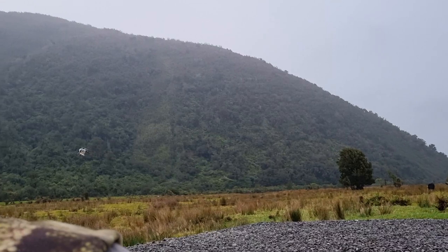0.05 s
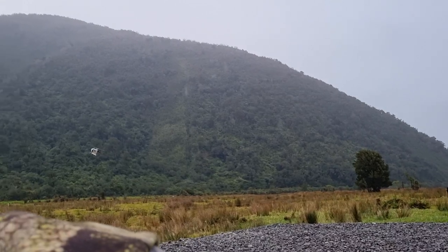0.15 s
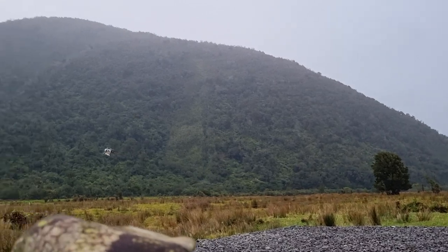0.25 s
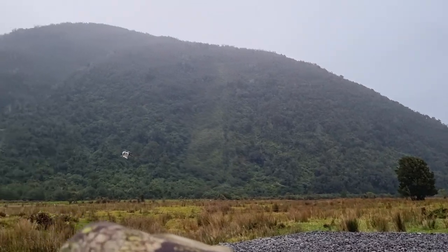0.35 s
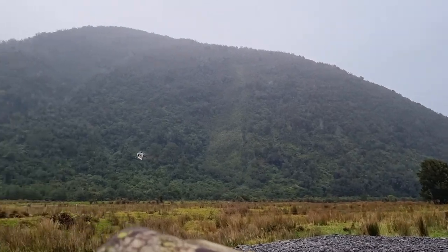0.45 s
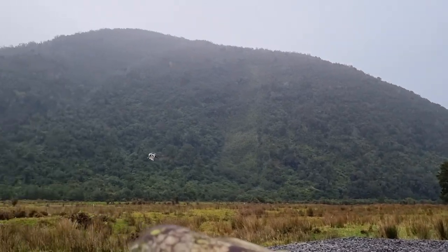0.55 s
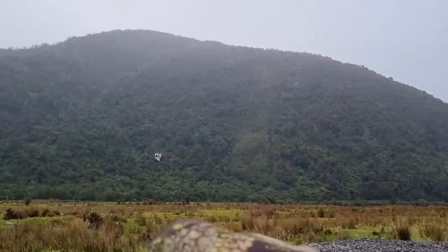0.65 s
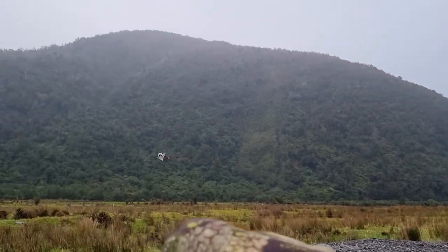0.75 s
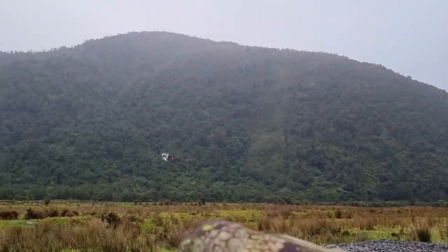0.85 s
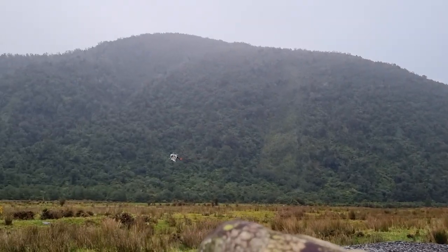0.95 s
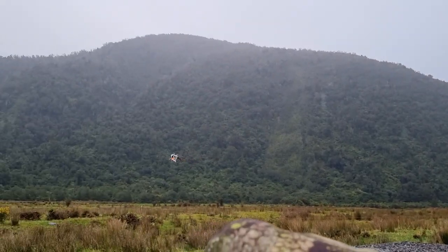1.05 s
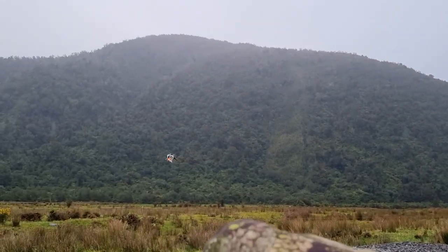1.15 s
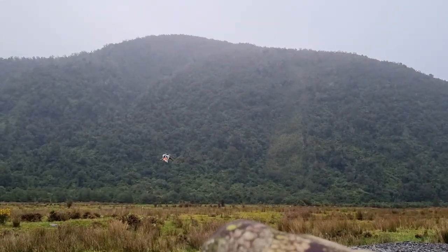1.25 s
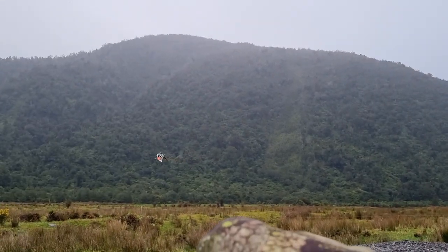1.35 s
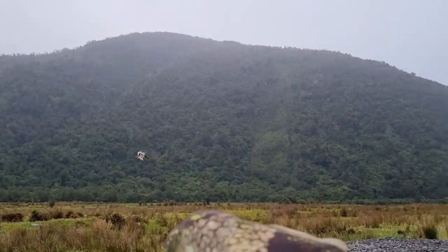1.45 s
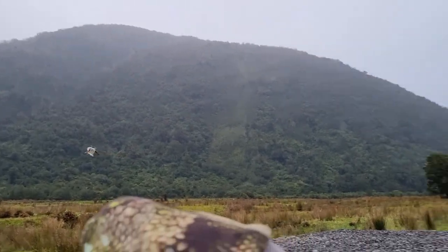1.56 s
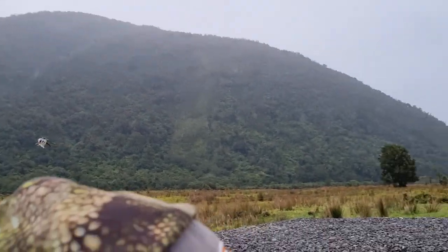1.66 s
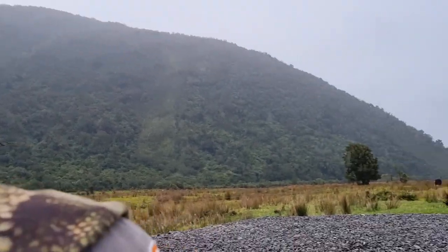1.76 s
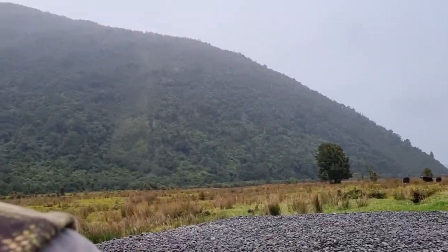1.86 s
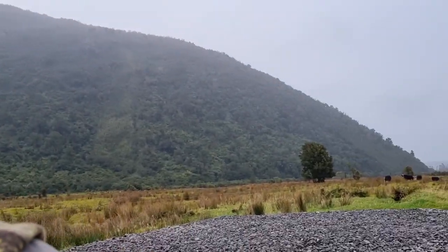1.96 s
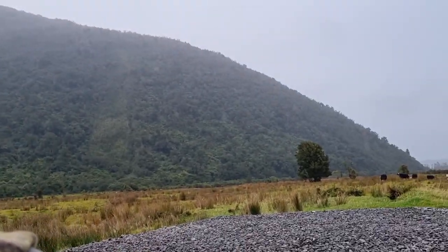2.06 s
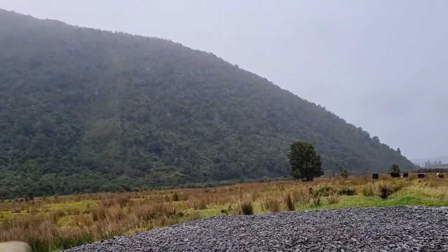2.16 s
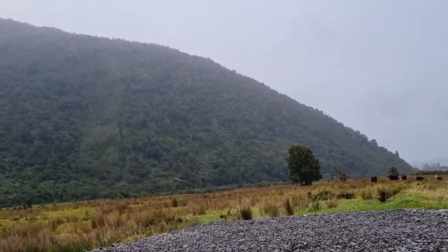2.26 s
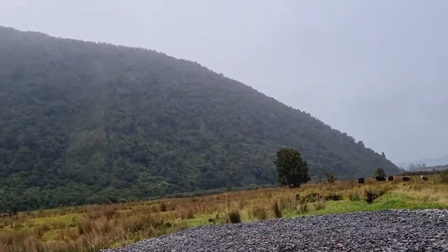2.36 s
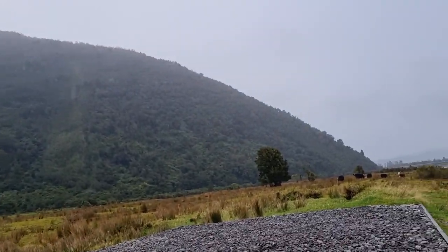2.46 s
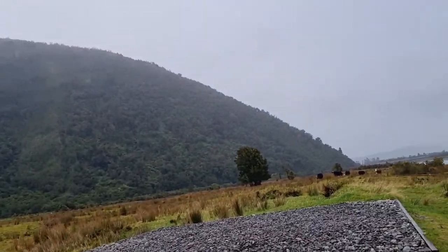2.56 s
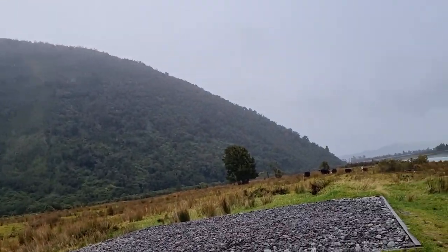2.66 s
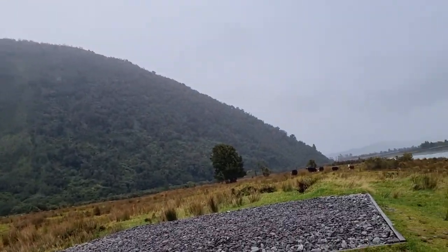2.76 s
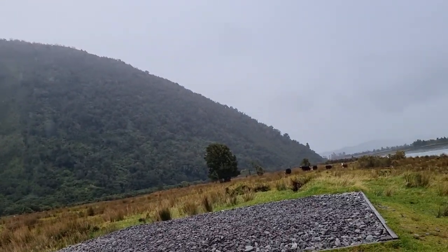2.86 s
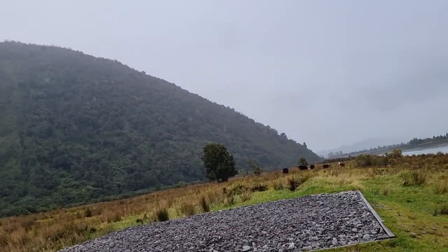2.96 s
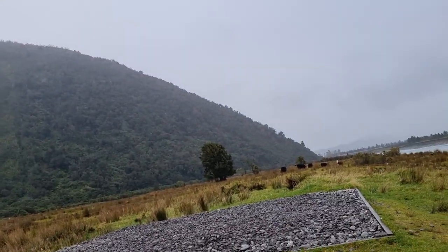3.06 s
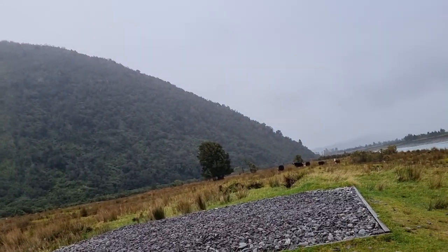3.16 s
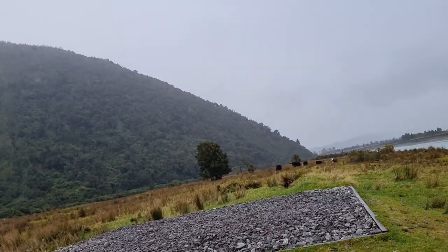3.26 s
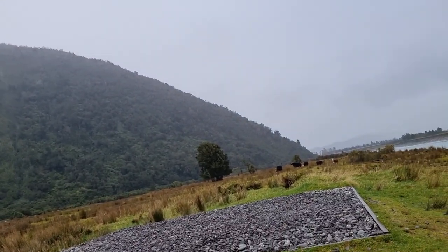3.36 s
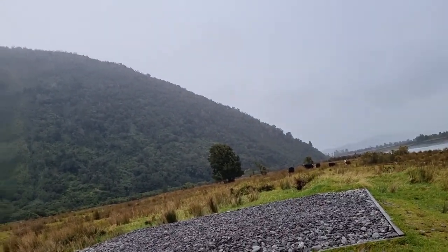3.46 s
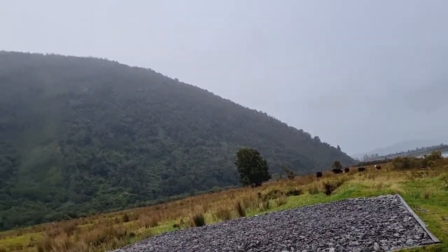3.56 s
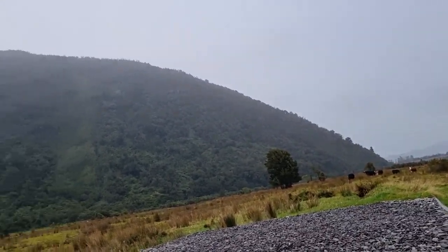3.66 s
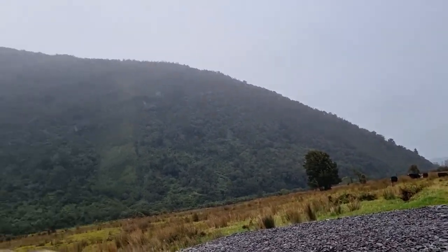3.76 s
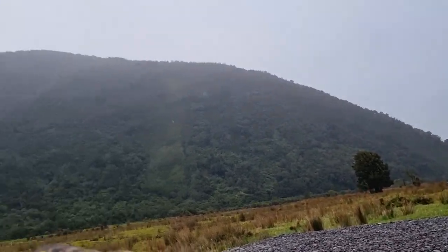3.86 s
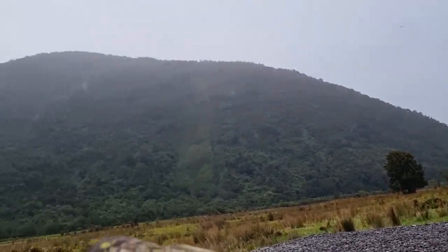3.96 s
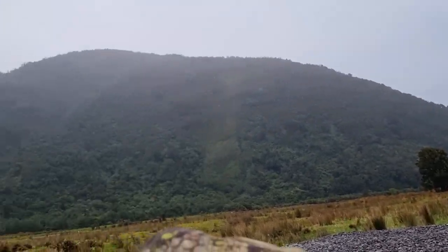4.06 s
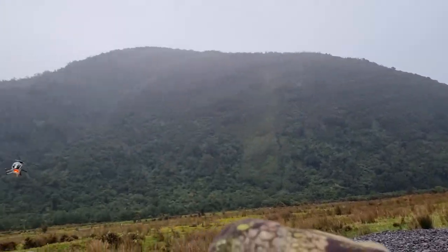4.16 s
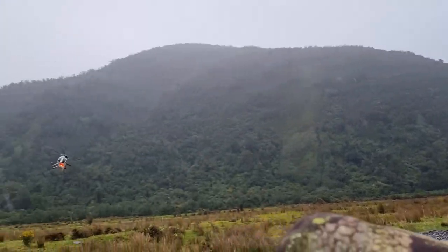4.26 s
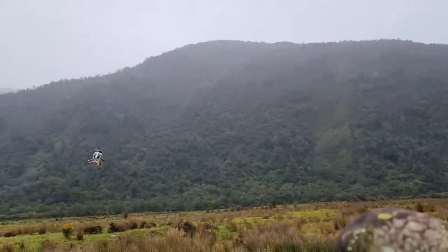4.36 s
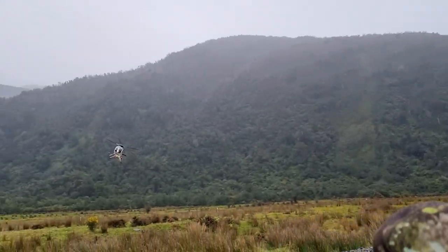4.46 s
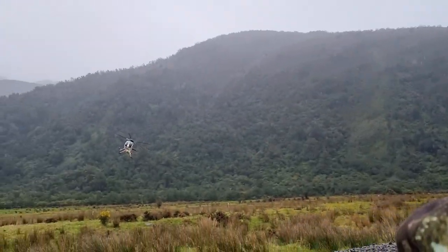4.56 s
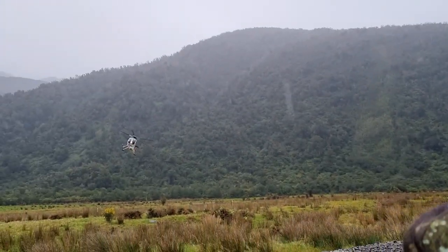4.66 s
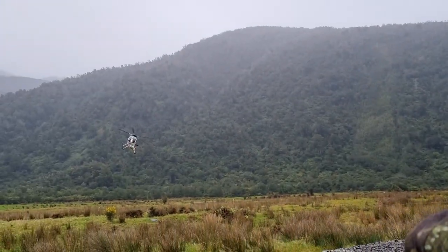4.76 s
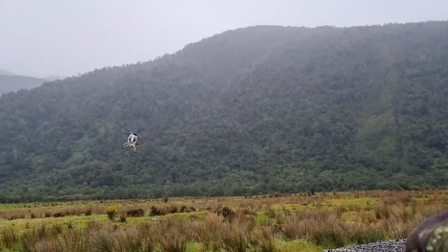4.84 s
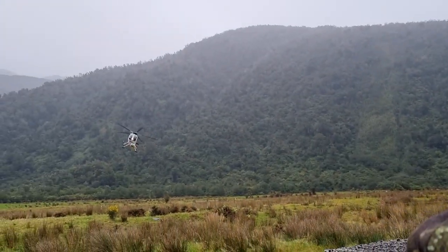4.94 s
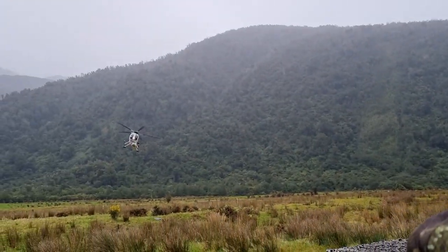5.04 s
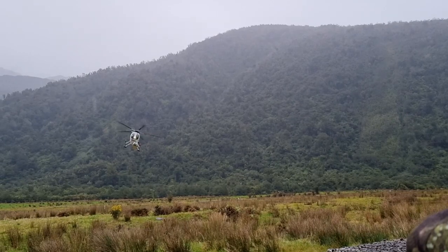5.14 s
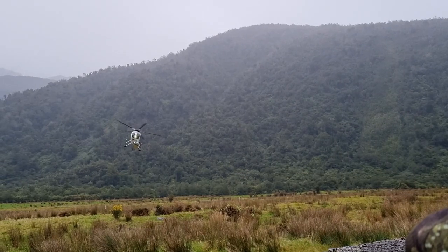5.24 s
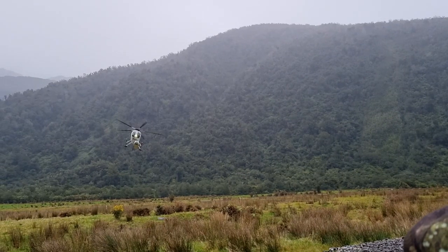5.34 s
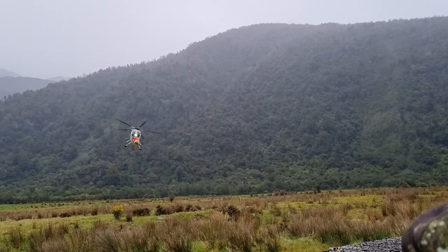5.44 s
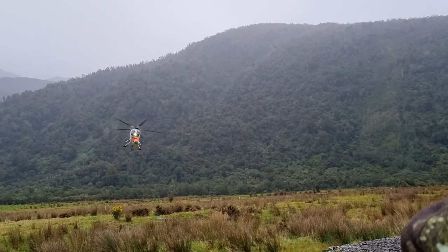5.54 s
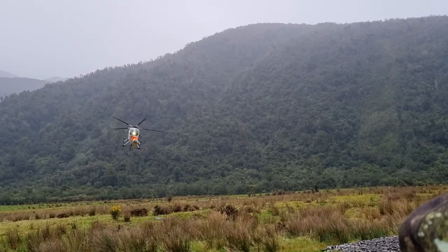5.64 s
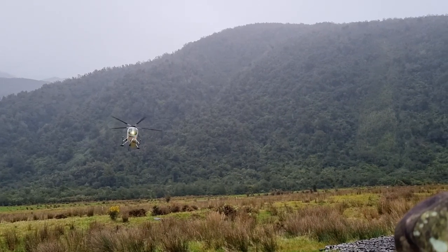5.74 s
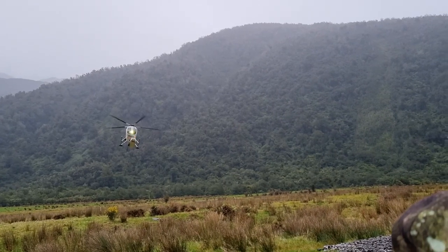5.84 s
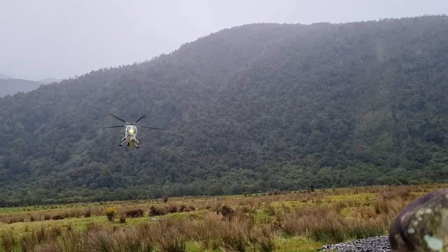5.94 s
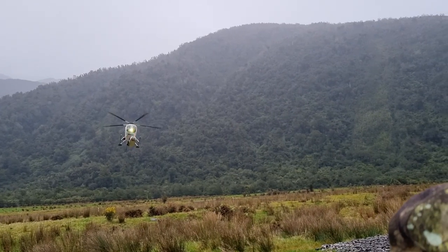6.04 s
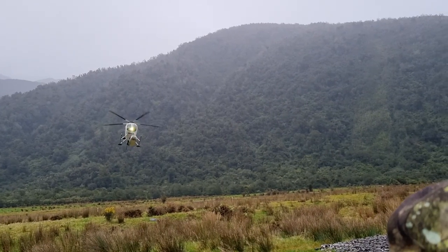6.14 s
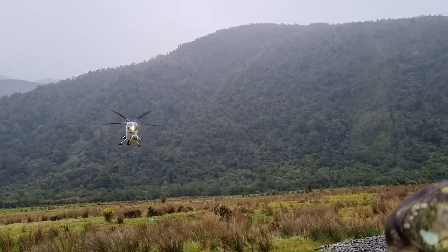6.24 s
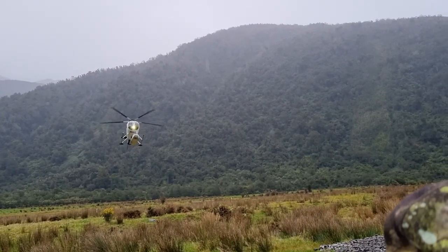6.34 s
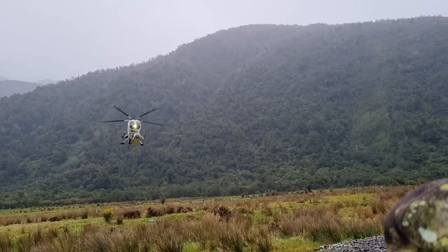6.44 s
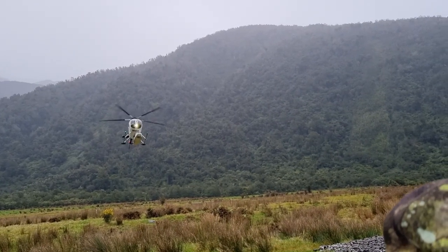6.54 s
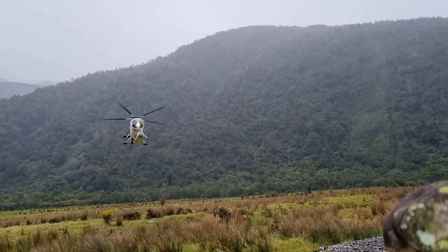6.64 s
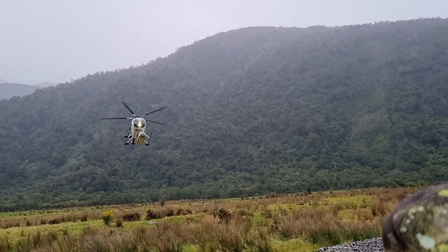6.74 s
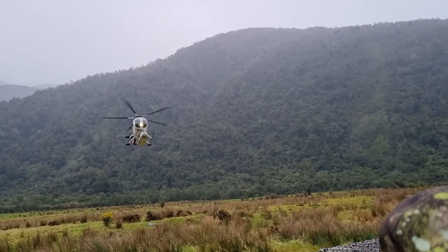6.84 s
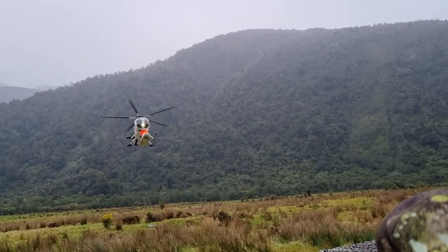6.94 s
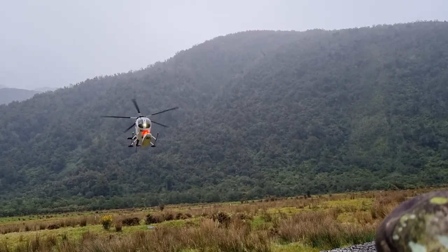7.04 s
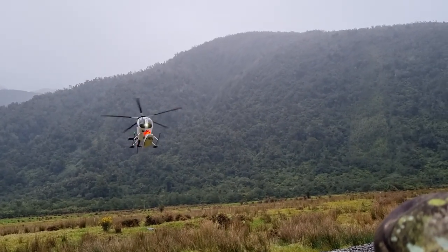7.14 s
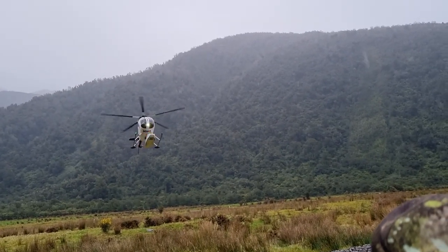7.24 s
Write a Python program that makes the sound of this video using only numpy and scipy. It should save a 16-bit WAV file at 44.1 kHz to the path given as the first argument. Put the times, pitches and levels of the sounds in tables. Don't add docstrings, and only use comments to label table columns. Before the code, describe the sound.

A distant helicopter's steady roar and fluttering hum come closer over a grassy valley. The colour and stereo image shift as the person holding the microphones turns aside, cloth barely rustling, then turns back. Quick airy swishes at each blade pass sharpen near four seconds, then give way to rapid, heavy, uneven blade slaps, full and close, easing only slightly at the end.

```python
import sys
import numpy as np
from scipy import signal
from scipy.fft import rfft, irfft
from scipy.io import wavfile
from scipy.ndimage import map_coordinates

SR = 44100
rng = np.random.default_rng(int(sys.argv[2]) if len(sys.argv) > 2 else 0)


def digitize_waveform(pressure):
    field = np.atleast_2d(pressure).T
    bounded = np.clip(field, -1, 1)
    quanta = np.round(bounded * 32767).astype(np.int16)
    wavfile.write(sys.argv[1], SR, quanta)


def to_linear_factor(level_db):
    exponent = np.asarray(level_db, float) / 20
    return 10 ** exponent


N = 321930
T = np.arange(N) / SR
HZ = np.fft.rfftfreq(N, 1 / SR) + 1e-3

CLOSING_DB_PER_S = 1.37
FLARE_S, FLARE_WIDTH_S = 4.71, 0.63


def rms_one(x):
    return x / np.sqrt(np.mean(x ** 2) + 1e-20)


def in_time(rows):
    s, *columns = np.transpose(rows)
    return [np.interp(T, s, c) for c in columns]


def at_hz(points, hz=HZ):
    table_hz, db = np.array(points).T
    return np.interp(np.log(hz), np.log(table_hz), db)


def colour(x, points):
    return irfft(rfft(x) * to_linear_factor(at_hz(points)), N)


def drift(rate_hz):
    r = np.exp(-80 * np.pi * rate_hz / SR)
    slow = signal.lfilter([1], [1, -2 * r, r * r], rng.standard_normal(N // 40 + 2002))[2000:]
    return np.interp(np.arange(N) / 40, np.arange(len(slow)), rms_one(slow))


def smooth_step(t, middle, width):
    return .5 + .5 * np.tanh((t - middle) / width)


def bump(t, middle, width):
    return np.exp(-((t - middle) / width) ** 2)


# time in seconds, rate in Hz.
BLADE_RATE = [(0.0, 44.191), (0.73, 43.658), (1.46, 43.515), (2.19, 43.185), (2.92, 43.176), (3.65, 42.871),
              (4.38, 42.369), (5.11, 41.844), (5.84, 41.948), (6.57, 42.041), (7.3, 41.725)]


def blade_cycles():
    return np.cumsum(in_time(BLADE_RATE)[0]) / SR


# time in seconds, level in dB.
THICKNESS_LEVEL = [(0, -35.5), (1.0, -32), (2.2, -31), (3.3, -29.5), (3.8, -26.5), (4.3, -33), (4.8, -36),
                   (5.3, -23.5), (5.85, -16.5), (6.4, -21.5), (7.3, -18)]
LIFT_DB, THIRD_DB, THIRD_FLARE_DB = -26.5, -38.5, 13.5
ORDER_LOSS_DB, ORDER_CURVE = 6.5, 0.71


def rotor_hum(cycles):
    near = CLOSING_DB_PER_S * (T - T[-1])
    flare = smooth_step(T, FLARE_S, FLARE_WIDTH_S)
    turn = 2 * np.pi * (cycles - .325)
    uneven = to_linear_factor(0.36 * np.cos(2 * np.pi * cycles / 5) + 0.26 * drift(30))
    first_db = LIFT_DB + near + 1.3 * drift(1.8)
    second_db = in_time(THICKNESS_LEVEL)[0] + 0.71 * drift(3.0)
    third_db = THIRD_DB + 0.38 * near + THIRD_FLARE_DB * flare
    third_db = third_db + 2.8 * bump(T, 5.98, 0.67) + 1.66 * drift(4.5)
    high = sum(to_linear_factor(-ORDER_LOSS_DB * k ** ORDER_CURVE) * np.cos((3 + k) * turn) for k in range(7))
    upper = to_linear_factor(second_db) * np.cos(2 * turn) + to_linear_factor(third_db) * high
    return np.sqrt(2) * (upper * uneven - to_linear_factor(first_db) * np.cos(turn))


# time in seconds, level in dB, place in the blade cycle 0-1,
# vortex spacing against the usual.
SLAP_COURSE = [
    (4.3, -51, 0.07, 0.84),
    (4.8, -27.5, 0.27, 1.04),
    (5.15, -19, 0.22, 0.99),
    (5.5, -15.5, 0.25, 1.13),
    (5.9, -15, 0.27, 1.14),
    (6.3, -16, 0.19, 1.12),
    (6.6, -15.5, .29, 1.12),
    (6.9, -17, 0.24, 1.1),
    (7.3, -18, 0.14, 1.06),
]
# frequency in Hz, level in dB per Hz.
SLAP_SPECTRUM = [(120, -39), (250, -12.5), (420, 3), (750, -3.5), (1000, 1), (1500, -9.5), (2000, -26.5),
                 (3000, -36), (4500, -31.5), (7000, -48.5)]
# delay in ms, level in dB.
VORTICES = [(-0.3, -5), (0.68, 0.5), (1.91, 1.1), (3, -11)]
BLADE_LAG_MS = [-0.29, -.05, 0.54, .6, -0.27]
CRACK_DB, CRACK_DB_PER_S = -18, 10
HARDEST_BLADE, SLIP_PER_S, TRACK_DB, TRACK_SPREAD_DB = 3.48, 2.36, 1.6, 3
SOFT_SPREAD = .1


def passes(cycles, place):
    return np.flatnonzero(np.diff(np.floor(cycles - place)) > 0)


def wake_slap(cycles, scatter_ms, scatter_db):
    level_db, place, spacing = in_time(SLAP_COURSE)
    at = passes(cycles, place)
    blade = np.floor(cycles[at]).astype(int) % 5
    hardest = HARDEST_BLADE + SLIP_PER_S * (at / SR - 5.9)
    hard = np.cos(2 * np.pi * (blade - hardest) / len(BLADE_LAG_MS))
    blade_db = TRACK_DB + TRACK_SPREAD_DB * hard
    blade_ms = np.array(BLADE_LAG_MS)[blade]
    apart = spacing[at] * (1 - SOFT_SPREAD * hard)
    luck = rng.standard_normal((len(at), 10))
    clicks = np.zeros(N)
    for k, (ms, db) in enumerate(VORTICES):
        late_ms = ms * apart * (1 + .07 * luck[:, 8]) + .4 * blade_ms + scatter_ms * luck[:, k]
        when = at + (late_ms * SR / 1000).astype(int)
        chance_db = scatter_db * (luck[:, 4 + k] + .7 * luck[:, 9])
        clicks[np.minimum(when, N - 1)] += to_linear_factor(db + blade_db + chance_db)
    clicks = irfft(rfft(clicks) * np.exp(-1.4j), N)
    body = rms_one(colour(clicks, SLAP_SPECTRUM))
    clicks = clicks * to_linear_factor(2.2 * drift(25))
    crack = rms_one(colour(clicks, [(1800, -89), (2800, 17.0), (4200, -12), (7000, -34)]))
    crack_db = CRACK_DB + CRACK_DB_PER_S * (np.arange(N) - N) / SR
    return to_linear_factor(level_db) * (body + to_linear_factor(crack_db) * crack)


# time in seconds, level in dB.
SWISH_LEVEL = [
    (1.5, -47.5),
    (2.2, -44),
    (2.9, -51),
    (3.5, -41),
    (4, -39),
    (4.4, -34),
    (5.3, -34),
    (5.8, -38),
    (7.3, -38),
]
# frequency in Hz, level in dB per Hz.
SWISH_SPECTRUM = [(1500, -1.5), (2500, -2), (3300, 1.5), (4500, -14.5), (6600, -9.5), (9000, -22),
                  (12000, -53), (16000, -45)]
SWISH_PLACE, SWISH_BODY_DB, SWISH_BODY_DB_PER_S = 0.434, 5.5, 3.5
# frequency in Hz, level in dB per Hz.
TICK_SPECTRUM = [(1300, -29), (1750, 9), (2050, -3), (2600, -25)]
TICK_S, TICK_WIDTH_S, TICK_DB = 3.55, 0.47, -44


def tip_swish(cycles, rise_ms, decay_ms):
    level_db, = in_time(SWISH_LEVEL)
    body_db = SWISH_BODY_DB + SWISH_BODY_DB_PER_S * np.minimum(T - FLARE_S, 0)
    at = passes(cycles, SWISH_PLACE)
    marks = np.zeros(N)
    marks[at] = to_linear_factor(1.1 * rng.standard_normal(len(at)))
    decay = np.exp(-1000 / (decay_ms * SR))
    rise = np.exp(-1000 / (rise_ms * SR))
    puff = signal.lfilter([1], np.convolve([1, -decay], [1, -rise]), marks + 1e-18)
    bright = rms_one(puff * colour(rng.standard_normal(N), SWISH_SPECTRUM))
    body_spectrum = [(220, -24), (400, 0.5), (1200, 10), (2000, -25.5)]
    body = rms_one(puff * colour(rng.standard_normal(N), body_spectrum))
    tick = rms_one(colour(puff * (1 + .5 * rng.standard_normal(N)), TICK_SPECTRUM))
    away = to_linear_factor(TICK_DB) * bump(T, TICK_S, TICK_WIDTH_S)
    return to_linear_factor(level_db) * (bright + to_linear_factor(body_db) * body) + away * tick


# time in seconds, level in dB.
TAIL_LEVEL = [(0, -43), (1.0, -41), (1.9, -30), (3.8, -31), (4.2, -34), (4.9, -25.5), (5.6, -27.5),
              (6.3, -29), (6.7, -52), (7.3, -43)]
# multiple of the tail blade rate, level in dB.
TAIL_HARMONICS = [(1, -10), (2, -2.5), (3, -21.5), (4, -21), (6, -19.5), (7, -15), (15, -9), (16, -26)]
TAIL_RATIO = 1.793


def tail_rotor(cycles):
    tone = 0
    for k, db in TAIL_HARMONICS:
        phase = 2 * np.pi * (k * TAIL_RATIO * cycles + rng.random())
        tone = tone + to_linear_factor(db + 1.03 * drift(1.0)) * np.cos(phase)
    return np.sqrt(2) * to_linear_factor(in_time(TAIL_LEVEL)[0] + 0.81 * drift(5.0)) * tone


# time in seconds, level in dB.
GEAR_LEVEL = [(0, -38.5), (.9, -45), (2.3, -28), (2.7, -38), (3.7, -32.5), (4.1, -78)]
GEAR_RATIO = 27.8


def gear_mesh(cycles):
    return np.sqrt(2) * to_linear_factor(in_time(GEAR_LEVEL)[0]) * np.cos(2 * np.pi * GEAR_RATIO * cycles)


# frequency in Hz, level in dB per Hz.
ROAR_SPECTRUM = [(29, -37), (50, -17), (100, -3.5), (170, -8.5), (270, -19.5), (500, -11), (800, -11.5),
                 (1300, -15.5), (2000, -31.5), (3000, -31), (5000, -36.5), (7000, -41), (11000, -40),
                 (15500, -34.5)]
# frequency in Hz, level in dB, share of the approach, flare in dB,
# intake in dB.
ROAR_ANSWERS = [(171, -4.5, 0.34, 9, 2.9), (710, -1, .1, -1.5, -5), (3230, 1.5, 0.29, -1, 5),
                (8600, 5.5, 1.32, -4, 6), (14000, 5, 4.6, -6.5, 4)]
# frequency in Hz, level in dB against direct.
SCATTER_SPECTRUM = [(60, 0), (250, -10.5), (600, -7.5), (1800, -3), (4500, -5.5), (9000, 0), (15000, 2)]
ROAR_DB = -26
INTAKE_S, INTAKE_WIDTH_S = 4.17, 0.55
BITE_DB, BITE_S = 2, 0.81


def roar(patchy_db):
    hz, *answers = np.transpose(ROAR_ANSWERS)
    flare = smooth_step(T, FLARE_S, FLARE_WIDTH_S)
    intake = bump(T, INTAKE_S, INTAKE_WIDTH_S)
    controls = [np.ones(N), CLOSING_DB_PER_S * (T - T[-1]), flare, intake]
    bite_db = BITE_DB * bump(T, FLARE_S + FLARE_WIDTH_S, BITE_S)
    noise = rfft(rng.standard_normal((3, N))) * to_linear_factor(at_hz(ROAR_SPECTRUM))
    noise[1:] *= to_linear_factor(at_hz(SCATTER_SPECTRUM))
    scale = to_linear_factor(ROAR_DB) / irfft(noise[0], N).std()
    half_octave = 2 * np.log2(HZ / 45)
    together = drift(2.5)
    out = np.zeros((3, N))
    for k in range(18):
        share = np.clip(1 - abs(half_octave - k), 0, 1)
        log_hz = np.log(45 * 2 ** (k / 2))
        level_db = sum(np.interp(log_hz, np.log(hz), a) * c for a, c in zip(answers, controls))
        flicker_db = patchy_db * (.5 * together + drift(13.7))
        out += to_linear_factor(level_db + bite_db + flicker_db) * irfft(noise * share, N)
    return scale * out


# time in seconds, samples by which the right port hears later.
TURN_LAG = [(0, 4.55), (.55, 0.29), (1.25, 0.36), (1.6, 6.5), (1.9, 11.3), (2.4, 14.1), (3.1, 17.3),
            (3.4, 16.6), (3.9, 12.5), (4.15, 7.7), (4.4, 3.2), (6, 5.26), (7.3, 4.86)]
# frequency in Hz, then dB facing left, facing right,
# turned left, turned right.
PORT_SPECTRA = [(198, 0, 0.45, 0, 0.9), (346, 6.5, 3, 4, 0), (788, -3, 0.5, 2.5, 1.5),
                (868, -8, -6.5, -2.5, -1.5), (1497, 3.5, 5, -7, -3.5), (1624, 4, 9.5, -3, 5),
                (2090, 3, 7.5, 0.5, 13), (2650, 5.5, -1, 1.5, -27), (3120, 2.5, 7, 7, 4),
                (3090, 3.5, 3, -1.5, 1), (4050, 1.5, 8, 3.5, 1.5), (5040, 0, 1.5, 3, 6),
                (6130, 5, 7.5, 5, 2), (9700, 1.5, 1.8, 0, -1.5)]
# lag in samples, level in dB.
CHEST_ECHO = [
    (45, -9.5),
    (49, -15.5),
]
BASS_DETOUR_SAMPLES = 4.65


def ports(x, scattered):
    low = colour(x, [(1800, -1.0), (2800, -41)])
    time, late = np.arange(N), in_time(TURN_LAG)[0]
    right = map_coordinates(x - low, [time - late], order=3, mode="nearest")
    right = right + np.interp(time - late - BASS_DETOUR_SAMPLES, time, low)
    sway = drift(.4)
    turned = np.clip((late - 6) / 8.9, 0, 1)
    table, out = np.array(PORT_SPECTRA), []
    for k, heard in enumerate(np.array([x, right]) + scattered):
        lag, db = CHEST_ECHO[k]
        lag = lag - 0.52 * late + 3.6 * sway
        bright = colour(heard, [(2500, -48), (4000, 4.0)])
        heard = heard + to_linear_factor(db) * np.interp(time - lag, time, bright)
        facing = colour(heard, table[:, [0, 1 + k]])
        away = colour(heard, table[:, [0, 3 + k]])
        out.append((1 - turned) * facing + turned * away)
    return np.array(out)


# frequency in Hz, level in dB.
GROUND_SPECTRUM = [(1550, -1), (1750, -11.5), (2050, -16), (2500, -3)]
GROUND_SHARE, GROUND_END_S, GROUND_FADE_S = 0.74, 1.28, 0.2


def ground(x):
    low_path = 1 - smooth_step(T, GROUND_END_S, GROUND_FADE_S)
    share = np.clip(GROUND_SHARE * low_path, 0, 1)
    return np.array([(1 - share) * side + share * colour(side, GROUND_SPECTRUM) for side in x])


# middle in seconds, half length in seconds, level in dB.
RUBS = [
    (1.42, 0.093, -53),
    (1.85, .07, -58),
    (2.08, 0.052, -52),
    (2.294, .05, -51),
    (2.457, 0.087, -50),
    (3.012, .015, -55),
    (3.212, .05, -53),
    (3.55, 0.05, -43),
]
# frequency in Hz, level in dB per Hz.
CLOTH_SPECTRUM = [(5000, -26), (8500, -5), (12000, 0.0), (16000, -1)]
RUSTLE_BED_DB = -68


def jacket_rustle():
    grain_db = 5.0 * rng.exponential(1, (2, N)).clip(0, 5)
    grains = rng.standard_normal((2, N)) * to_linear_factor(grain_db)
    rubs = to_linear_factor(RUSTLE_BED_DB) * bump(T, 2.2, 1.0)
    rubs = rubs + sum(to_linear_factor(db) * bump(T, s, half_s) for s, half_s, db in RUBS)
    return rubs * to_linear_factor(0.5) * rms_one(colour(grains, CLOTH_SPECTRUM))


def scene():
    cycles = blade_cycles()
    tones = rotor_hum(cycles) + tail_rotor(cycles) + gear_mesh(cycles)
    pulses = wake_slap(cycles, scatter_ms=.07, scatter_db=1.9)
    pulses = pulses + tip_swish(cycles, rise_ms=0.46, decay_ms=2.76)
    straight, *scattered = roar(patchy_db=1.27)
    tail = rng.standard_normal((2, 1500)) * np.exp(-np.arange(1500) / (0.026 * SR))
    tail = tail / np.sqrt((tail[0] ** 2).sum())
    echo = signal.fftconvolve(pulses[None], tail, axes=1)[:, :N]
    heard = ports(tones + straight + pulses, np.array(scattered) + to_linear_factor(-17.0) * echo)
    return ground(heard) + jacket_rustle()


def roll_off(x):
    return signal.sosfilt(signal.butter(12, 16090, fs=SR, output="sos"), x)


def record(dry):
    top = 1.1
    cut = signal.cheby2(12, 60, 16100, fs=SR, output="sos")
    mix = signal.sosfilt(cut, top * np.tanh(dry / top))
    return roll_off(mix)


dry = scene()
out = record(dry)
digitize_waveform(out)
```